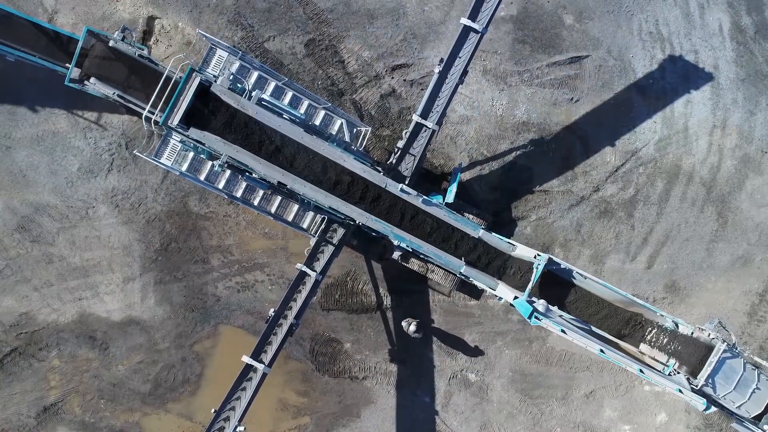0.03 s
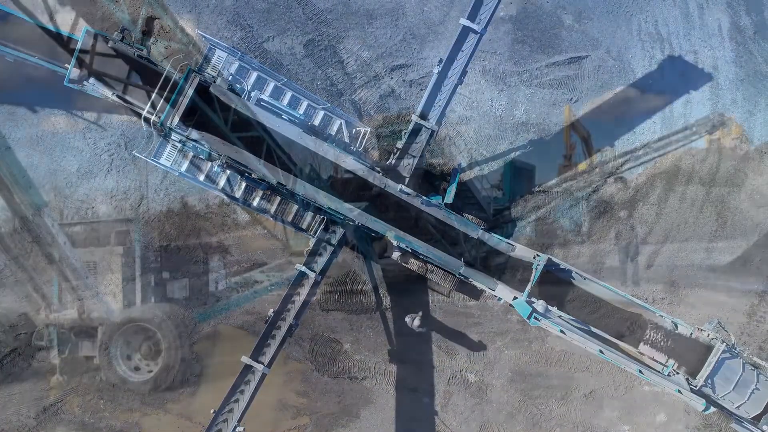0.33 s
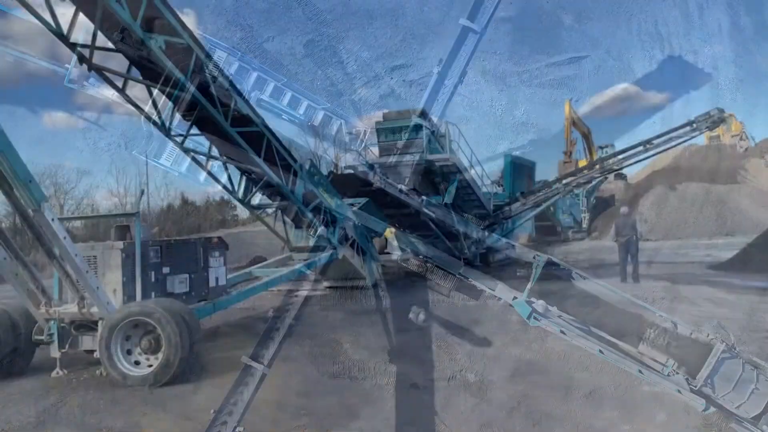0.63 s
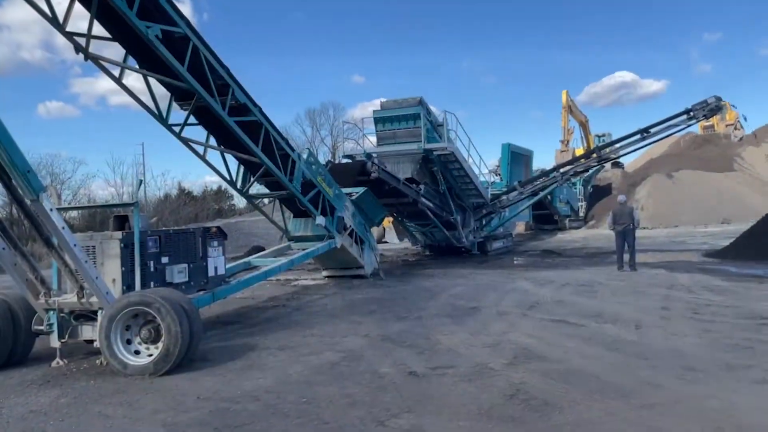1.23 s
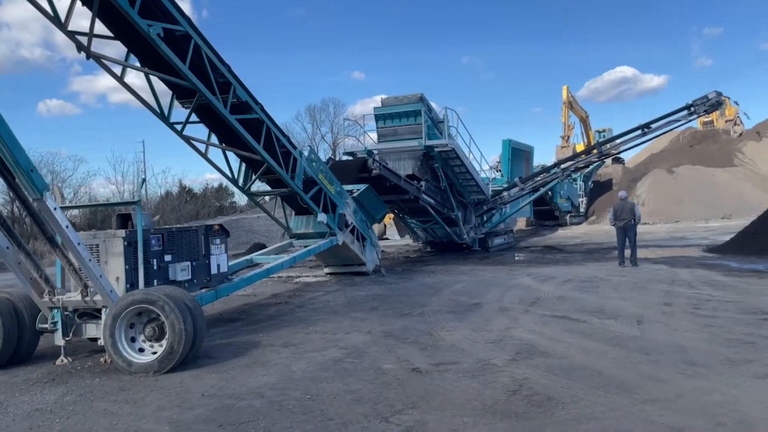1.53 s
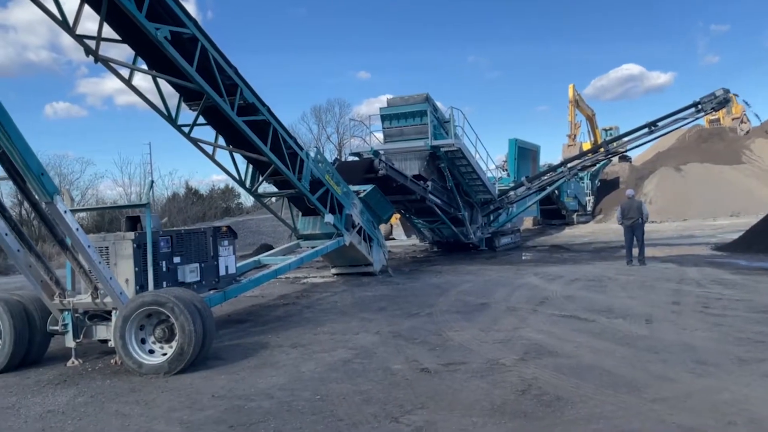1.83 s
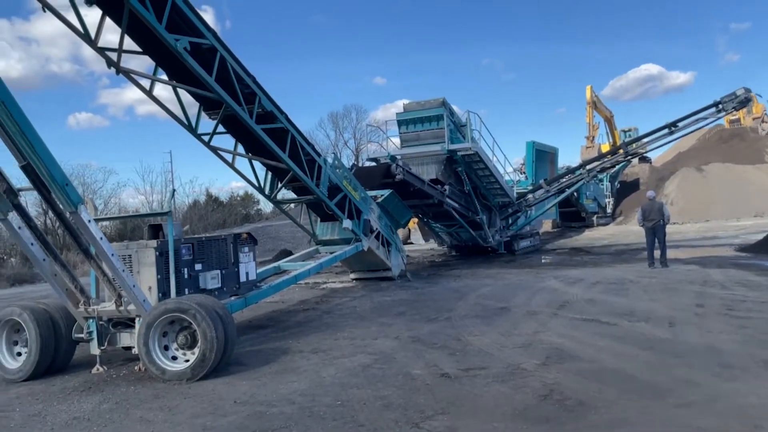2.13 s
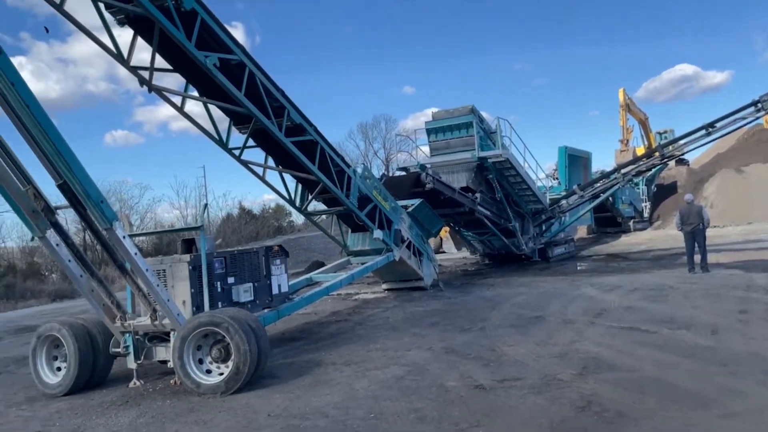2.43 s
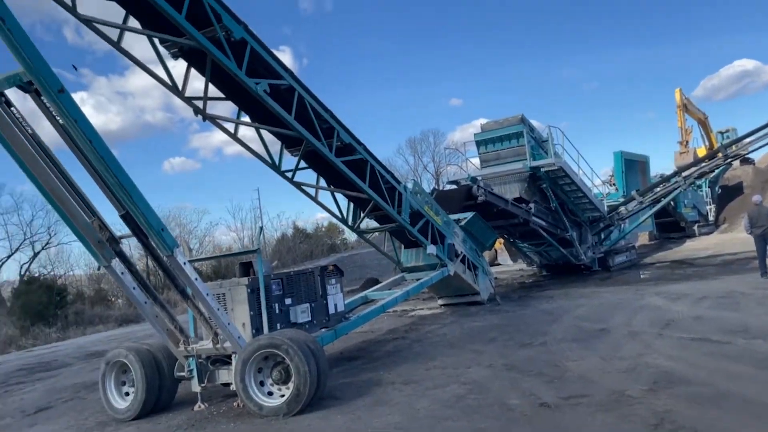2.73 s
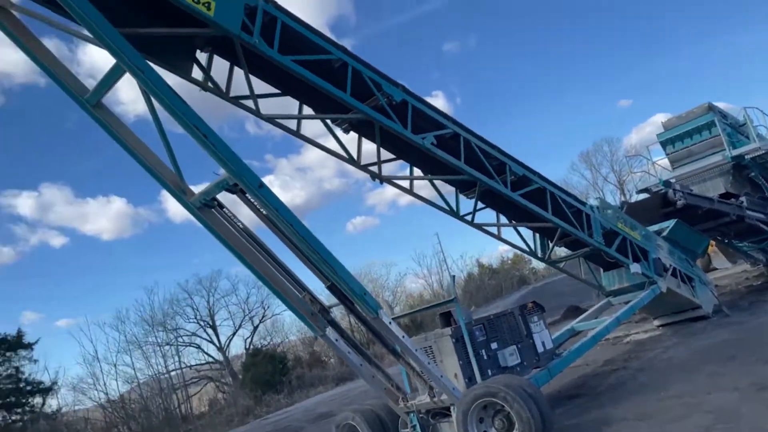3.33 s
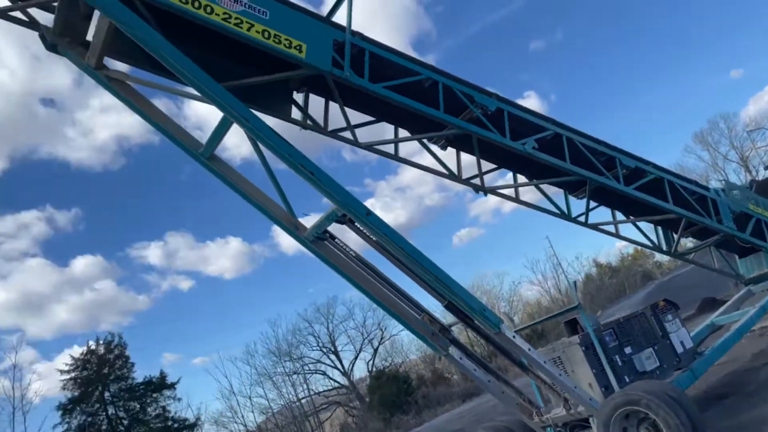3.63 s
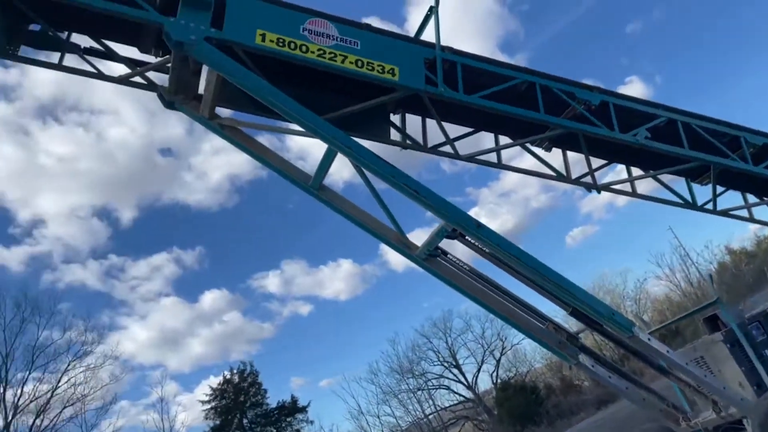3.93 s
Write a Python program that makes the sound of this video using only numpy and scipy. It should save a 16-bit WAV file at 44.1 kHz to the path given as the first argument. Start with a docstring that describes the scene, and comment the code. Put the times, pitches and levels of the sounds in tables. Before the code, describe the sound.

Crushing and screening machinery runs loudly outdoors over a diesel drone and low rumble. A thin hiss stops early, then stones knock and clink irregularly on steel above sliding grit. The sound shifts slightly as the microphone finally turns.

```python
"""A stone crushing and screening plant

In an open yard a diesel engine drones at a steady speed, with more drives humming behind it.
Crusher and screens roar, grit streams over the belts and now and then stones clatter on steel.
For the first half second the plant is quieter and a high hiss is heard.
Near the end the microphone turns away."""
import sys
import numpy as np
from scipy import signal
from scipy.fft import rfft, irfft, next_fast_len
from scipy.io import wavfile
from scipy.ndimage import uniform_filter1d, map_coordinates

SR = 44100
rng = np.random.default_rng(int(sys.argv[2]) if len(sys.argv) > 2 else 0)


def int16_out(signal):
    """Quantize to a 16-bit WAV file."""
    q = np.round(np.clip(np.atleast_2d(signal).T, -1, 1) * 32767)
    wavfile.write(sys.argv[1], SR, q.astype(np.int16))


N = 176400
TIME = np.arange(N) / SR
CYCLE_HZ = 24.02  # engine cycles a second, with four firings in each
OVERTONES_FOLLOW = 1.5  # dB that overtones and whines lose for each dB the firing note loses
ATTACK_S = 0.0013  # how quickly a stone's hit builds up


def amp(db):
    """Turn decibels into a number to multiply by."""
    return 10 ** (np.asarray(db) / 20)


def unit(x):
    """Scale a signal to an average (rms) level of 1."""
    return x / np.sqrt(np.mean(x ** 2) + 1e-20)


def along(points, hz):
    """Read between (Hz, value) points, with octaves evenly spaced."""
    freqs, values = np.transpose(points)
    return np.interp(np.log(hz + 1), np.log(freqs + 1), values)


def wobble(rate):
    """A smooth curve through `rate` random values a second."""
    return map_coordinates(rng.standard_normal(1024), [TIME * rate], mode="wrap")


def filtered(x, response):
    """Give each frequency in x the gain response(hz)."""
    size = next_fast_len(N + SR // 2)
    return irfft(rfft(x, size) * response(np.fft.rfftfreq(size, 1 / SR)), size)[..., :N]


def patchy(depth_db):
    """Two white noises with louder and softer patches across pitch and time."""
    spectra = signal.stft(rng.standard_normal((2, N)), nperseg=512)[2]
    patches = uniform_filter1d(rng.standard_normal(spectra.shape[1:]), size=4, axis=0)
    patches = unit(uniform_filter1d(patches, size=10, axis=1))
    return unit(signal.istft(spectra * amp(depth_db * patches), nperseg=512)[1][:, :N])


def spread(pair, mid_points, side_points, side_db=-1.5):
    """Shape two noises into stereo: mid is what both ears share, side is how they differ."""
    shaped = filtered(pair, lambda hz: amp([along(mid_points, hz), along(side_points, hz) + side_db]))
    mid, side = shaped * np.sqrt(SR / 2)
    return np.array([mid + side, mid - side])


def tone(turns, hz, db, flutter_db, drift):
    """One pure tone; yard echoes make higher ones waver more and differ between the ears."""
    echo_share = hz / (hz + 950)
    phase = 2 * np.pi * (turns + rng.random()) + drift * echo_share * wobble(7)
    apart = echo_share * wobble(2.07)
    level = amp(db + flutter_db * echo_share * wobble(26 * np.sqrt(echo_share)))
    return np.sqrt(2) * level * np.sin(np.array([phase + apart, phase - apart]))


def engine(turns, gain, right_louder_db=1.55):
    """The near diesel: a strong firing note and its overtones, duller when it is fainter."""
    # The strong tones. Each row: multiple of the cycle rate, level in dB.
    strong_tones = [(4, -13), (6, -33), (8, -22), (12, -30.3), (16, -46), (18, -39), (19, -43.5),
                    (20, -47.5), (21, -35), (24, -34.5), (28, -38.5), (48, -38), (96, -40.5)]
    # Outline of the weak tones between them. Each row: frequency in Hz, level in dB.
    weak_tones = [(100, -56), (300, -47), (680, -48.5), (850, -52), (1120, -46.5), (1300, -61),
                  (1600, -45.5)]
    levels = {k: along(weak_tones, k * CYCLE_HZ) for k in range(5, 66)}
    levels.update(strong_tones)
    drone = np.zeros((2, N))
    for k, db in levels.items():
        tone_gain = gain if k == 4 else gain ** OVERTONES_FOLLOW  # 4 is the firing note
        drone += tone_gain * tone(k * turns, k * CYCLE_HZ, db, flutter_db=3.5, drift=1.4)
    return drone * amp([[-right_louder_db / 2], [right_louder_db / 2]])


def drives(gain):
    """Farther drives hum almost evenly; faint whines rise and fall with the near engine's level."""
    # Hums of other engines and a fan. Each row: pitch in Hz, level in dB.
    hum_tones = [(73.3, -30.5), (83.8, -38.5), (138, -32.5), (184.1, -33.5), (354.9, -32), (476.5, -40)]
    # Whines of belts and bearings. Each row: pitch in Hz, level in dB.
    whine_tones = [(1034, -46), (1441.5, -46.5)]
    hums = sum(tone(hz * TIME, hz, db, flutter_db=5.5, drift=1.2) for hz, db in hum_tones)
    whines = sum(tone(hz * TIME, hz, db, flutter_db=5.5, drift=1.2) for hz, db in whine_tones)
    return gain ** 0.11 * hums + gain ** OVERTONES_FOLLOW * whines


def hollow(x, pitch_hz, boost_db=2.5, width_hz=87):
    """A resonance lifts one narrow band, which sounds hollow."""
    return filtered(x, lambda hz: amp(boost_db / (1 + ((hz - pitch_hz) / width_hz) ** 2)))


def roar(turns, low_gain, upper_gain, split_hz=640, drop_s=2.2):
    """Noise of crusher, screens and burning fuel, throbbing a little with the engine cycle."""
    # The roar's tone colour, mid and side. Each row: frequency in Hz, relative level in dB.
    mid = [(28, -75), (46, -44.5), (70, -49.5), (170, -47), (265, -49), (320, -55), (420, -55), (520, -52),
           (700, -51.5), (830, -54.5), (1100, -52.5), (1350, -59.5), (1800, -62.5), (2400, -67),
           (3500, -72), (7000, -105)]
    side = [(28, -75), (55, -47), (180, -60), (300, -62), (750, -55.5), (1000, -57.5), (1700, -66),
            (2400, -63), (3500, -81), (7000, -105)]
    throb = 1 + 0.06 * np.cos(2 * np.pi * turns)
    swell = amp(0.5 * wobble(10))
    noise = swell * spread(patchy(depth_db=1.09) * throb, mid, side)
    # The hollow note steps down shortly before the microphone turns.
    noise = np.where(TIME <= drop_s, hollow(noise, pitch_hz=627), hollow(noise, pitch_hz=433))
    low = filtered(noise, lambda hz: 1 / (1 + (hz / split_hz) ** 10))
    return low_gain * low + upper_gain * (noise - low)


def rumble():
    """The heavy machines rumble low and evenly, nearly alike in both ears."""
    # The rumble's tone colour. Each row: frequency in Hz, relative level in dB.
    colour = [(15, -69), (30, -64), (42, -50), (60, -45.5), (130, -67), (400, -120)]
    return spread(rng.standard_normal((2, N)) * amp([[0], [-8]]), colour, colour)


def grit(ticks_per_s=500, tick_db=-8.5, surge_db=1.07):
    """Fine grit slides over belts and chutes, with the ticks of single pebbles in it."""
    # The grit's tone colour, mid and side. Each row: frequency in Hz, relative level in dB.
    mid = [(900, -79), (2700, -73), (4600, -70.5), (6000, -77), (6900, -77.5), (7600, -81.5), (9200, -91.5),
           (10200, -83), (13200, -80), (14000, -86), (14800, -102)]
    side = [(900, -104), (3100, -67), (5000, -71), (6000, -73), (7400, -80), (8600, -77), (11200, -78),
            (12100, -91), (13200, -108)]
    hits = rng.random((2, N)) < ticks_per_s / SR
    signs = np.sign(rng.standard_normal((2, N)))
    strengths = amp(5 * rng.standard_normal(N).clip(-2, 2))
    ticks = amp(tick_db) * unit(hits * signs * strengths)
    flow = amp(-1 + surge_db * wobble(40))
    return flow * spread(patchy(depth_db=2.0) + ticks, mid, side)


def hiss(end_s=0.526, fade_s=0.027):
    """A narrow, high hiss that stops as the plant gets louder."""
    # The hiss's tone colour. Each row: frequency in Hz, relative level in dB.
    colour = [(5000, -100), (6100, -76), (6680, -68), (7100, -73), (7700, -91)]
    fade = np.clip((end_s - TIME) / fade_s, 0, 1)
    return fade * spread(patchy(depth_db=2.5) * amp([[0], [-5]]), colour, colour)


def stone(db, ring_hz, treble_db, ring_db=10, ring_width_hz=240, fade_s=0.12):
    """A stone lands with a short, ragged crack that rings the steel under it."""
    # The crack's tone colour. Each row: frequency in Hz, relative level in dB.
    crack = [(200, -29), (1300, 13.5), (2500, 2.5), (4800, 3), (7000, -9), (9500, -7), (13000, -13),
             (15000, -47)]
    t = np.arange(SR // 2) / SR
    hz = np.fft.rfftfreq(len(t), 1 / SR)
    ring = ring_db / (1 + ((hz - ring_hz) / ring_width_hz) ** 2)
    treble = treble_db * (1 - 1 / (1 + (hz / 7800) ** 10))
    noise = rng.standard_normal((2, len(t)))
    burst = unit(irfft(rfft(noise) * amp(along(crack, hz) + ring + treble)))
    rattle_db = 1.5 * np.interp(t * 250, np.arange(256), rng.standard_normal(256))
    return burst * (1 - np.exp(-t / ATTACK_S)) * amp(db - 60 * t / fade_s + rattle_db)


def stones(small_count=36):
    """Large stones land at set times, and smaller ones fall at random between them."""
    # The large stones. Each row: start in seconds, level in dB, ring in Hz, treble change in dB.
    large = [(.876, -21, 3400, -8), (1.423, -21, 3550, 3), (2.191, -20.5, 2630, -16),
             (2.232, -22.5, 3800, -8), (2.32, -23.5, 4700, -5), (2.358, -26, 4640, -7),
             (2.631, -20, 4230, -13), (2.636, -23, 2370, -10), (2.762, -25, 4680, 4),
             (2.826, -35, 4200, 18), (2.942, -22.5, 2900, -15), (3.031, -24.5, 2700, -3),
             (3.046, -23, 1770, -1), (3.15, -27, 4380, 10)]
    starts = rng.random(small_count) * N / SR
    small = [(start, -29 - 13 * abs(softness), 3960 * np.exp(0.21 * pitch), 4 * treble)
             for start, (softness, pitch, treble) in zip(starts, rng.standard_normal((small_count, 3)))]
    out = np.zeros((2, N + SR))
    for start, db, ring_hz, treble_db in [*large, *small]:
        first = round(start * SR)
        out[:, first:first + SR // 2] += stone(db, ring_hz, treble_db)
    return out[:, :N]


def clinks(fade_s=0.14):
    """Stones glance off bare steel, each leaving one thin ring."""
    # The glancing hits. Each row: start in seconds, level in dB, ring in Hz.
    hits = [(.908, -32, 4150), (1.441, -26, 4204), (1.558, -31, 4690)]
    out = np.zeros((2, N))
    for start, db, hz in hits:
        t = np.maximum(TIME - start, 0)
        waver = 0.5 * np.array([wobble(90), wobble(90)])
        ring = np.sin(2 * np.pi * hz * t + waver)
        out += ring * (1 - np.exp(-t / ATTACK_S)) * amp(db - 60 * t / fade_s)
    return out


def from_direction(pair):
    """Sound reaches the nearer side first: right, left, then right again as the microphone turns."""
    # The plant's direction. Each row: time in seconds, head start of the left side in milliseconds.
    left_lead = [(.46, -0.4), (.52, 0.23), (2.6, 0.22), (3.2, -0.03), (3.8, -0.2)]
    lead_samples = np.interp(TIME, *np.transpose(left_lead)) * SR / 1000
    return np.array([map_coordinates(x, [np.arange(N) + side * lead_samples / 2], mode="mirror")
                     for x, side in zip(pair, (1, -1))])


def scene():
    """All parts of the plant together."""
    # Loudness changes. Each row: time in seconds, then engine, low roar, upper roar and grit in dB.
    levels = [(0, -3.5, -3.5, -2.5, -3.5), (.45, -5.7, -2, -1, -1), (.495, 0, 0, -0.5, 0),
              (1.1, -0.5, 1.5, .3, 0.3), (2.2, -0.5, 0.7, .5, 0.1), (3.05, -1, 1, -0.5, 0),
              (3.4, -1, 1, -1, 0.5), (3.72, -1, 2.5, -2, -2.5), (4, -1.5, 1.2, -2.5, 0)]
    times, *columns = np.transpose(levels)
    engine_gain, low_gain, upper_gain, grit_gain = [amp(np.interp(TIME, times, db)) for db in columns]
    turns = CYCLE_HZ * TIME + 0.0018 * wobble(2.9)  # engine cycles so far, slightly uneven
    machines = engine(turns, engine_gain) + drives(engine_gain) + roar(turns, low_gain, upper_gain)
    return from_direction(machines) + rumble() + grit_gain * grit() + stones() + clinks() + hiss()


def record(dry, top_hz=15600):
    """The microphone softens one narrow treble band, and the recorder cuts the very highest sounds."""
    # The microphone's tone colour. Each row: frequency in Hz, gain in dB.
    colour = [(5200, -0.5), (5600, -8.5), (5950, -1.5)]
    return filtered(dry, lambda hz: amp(along(colour, hz)) * (hz < top_hz))


dry = scene()
out = record(dry)
int16_out(out)
```